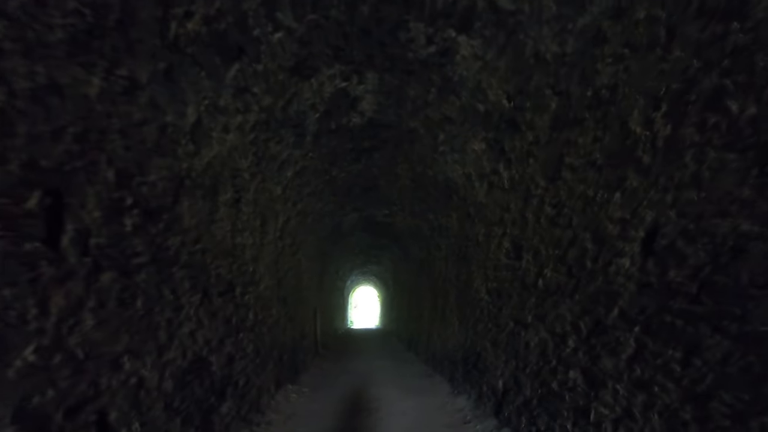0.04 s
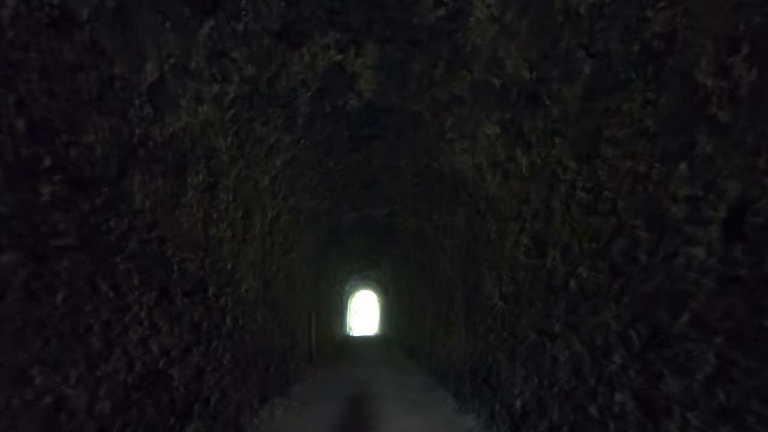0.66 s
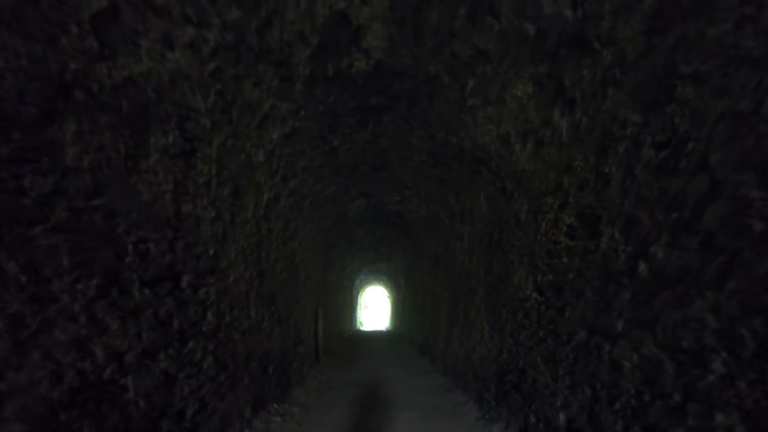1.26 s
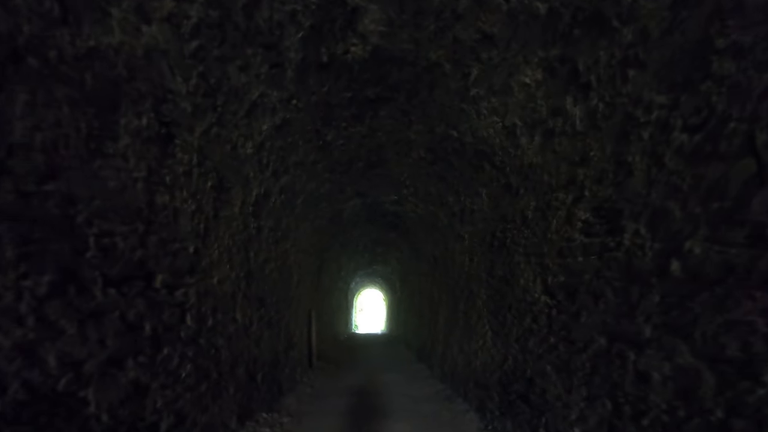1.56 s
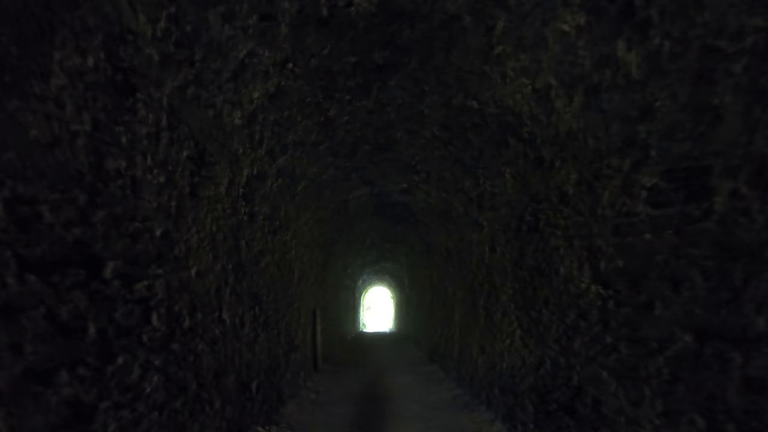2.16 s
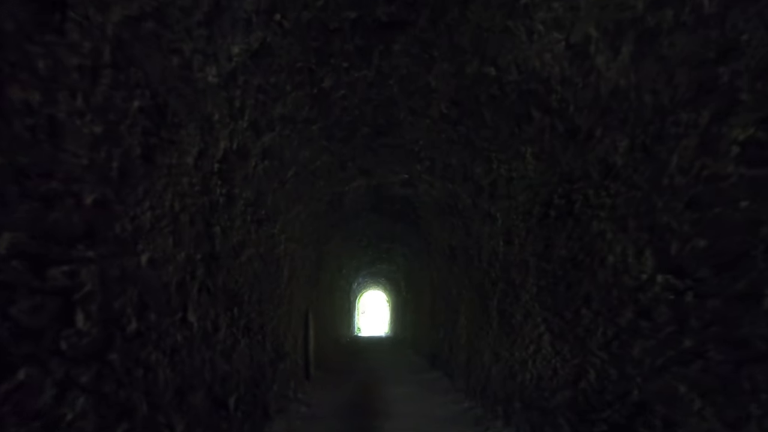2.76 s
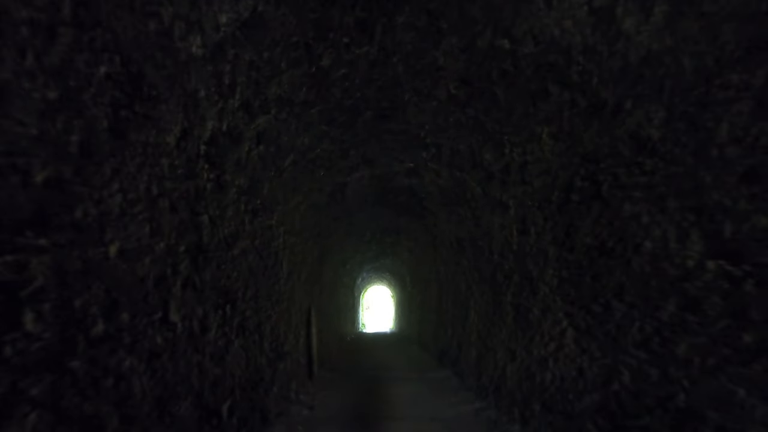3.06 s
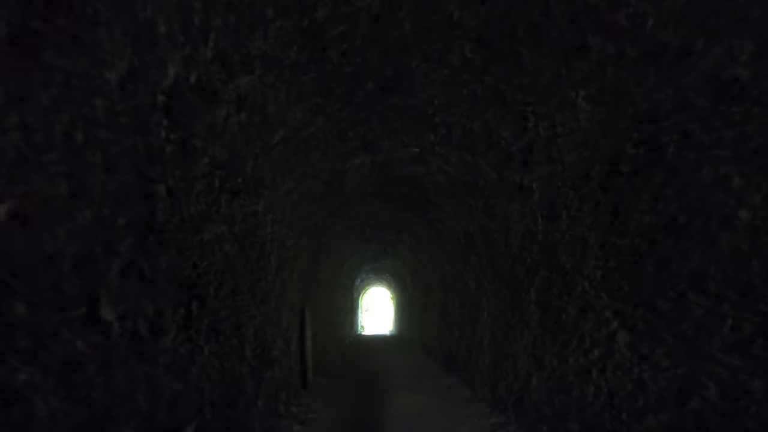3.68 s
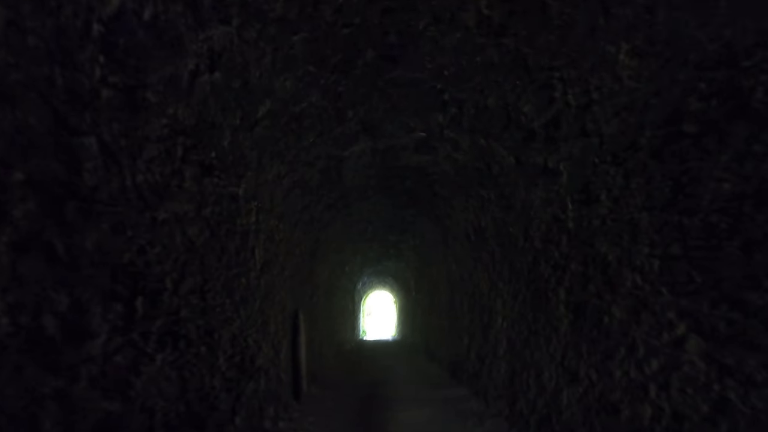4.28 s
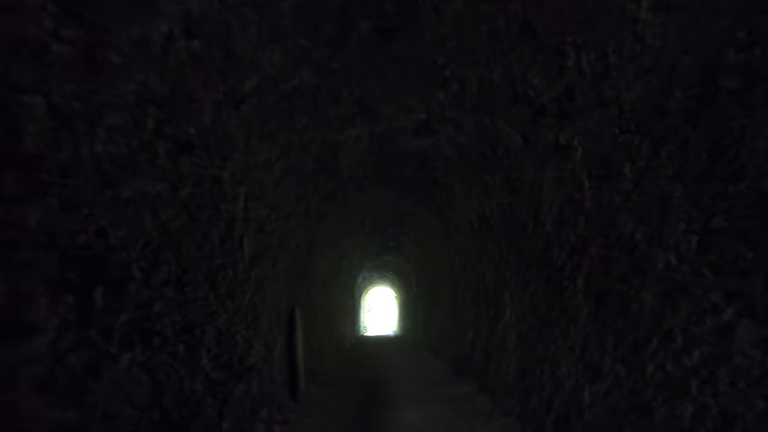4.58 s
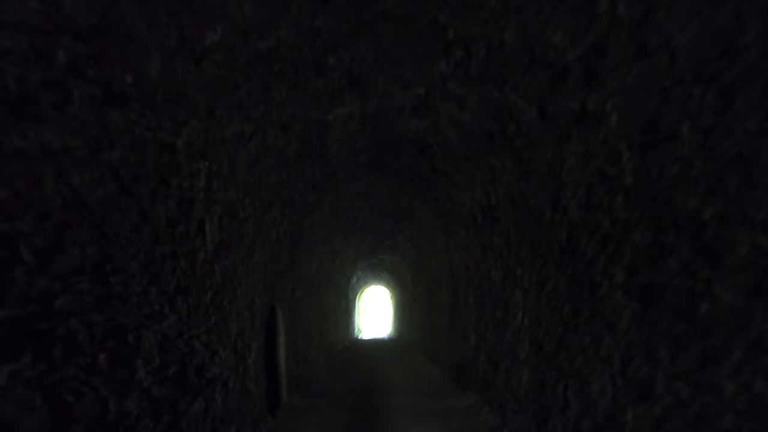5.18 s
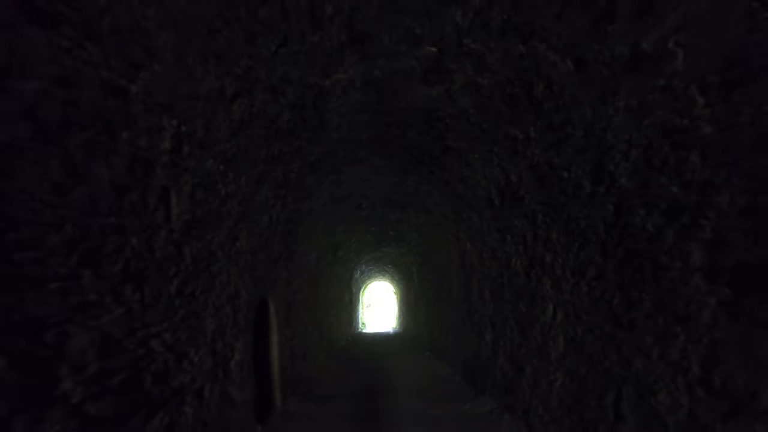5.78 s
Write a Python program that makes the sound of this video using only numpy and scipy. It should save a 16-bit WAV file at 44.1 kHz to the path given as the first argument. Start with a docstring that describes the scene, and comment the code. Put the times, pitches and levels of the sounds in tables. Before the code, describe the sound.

Someone walks through a stone tunnel, each step grinding grit and knocking small stones, with a short echo and faint clothing swish.

```python
"""Footsteps in a stone tunnel

Someone walks steadily over packed dirt and gravel through a narrow tunnel. Each sole lands with a
dull thud, knocks stones together and grinds the grit; clothing swishes and air buffets the
microphone with the stride. The close walls throw every knock back and the bore booms faintly
over a low wash of air."""
import sys
import numpy as np
from scipy import signal
from scipy.fft import rfft, irfft
from scipy.io import wavfile

SR = 44100
rng = np.random.default_rng(int(sys.argv[2]) if len(sys.argv) > 2 else 0)


def master(y):
    """Save y as 16-bit WAV."""
    cut = np.clip(np.atleast_2d(y).T, -1, 1)
    pcm = np.round(cut * 32767)  # scale
    wavfile.write(sys.argv[1], SR, pcm.astype(np.int16))


N = 257103
TIME_S = np.arange(N) / SR


def from_db(db):
    return 10 ** (np.asarray(db) / 20)


def unit_rms(x):
    return x / np.sqrt(np.mean(x ** 2) + 1e-20)


def gain_curve(rows):
    """Gain at every sample from rows of (s, dB)."""
    return from_db(np.interp(TIME_S, *np.transpose(rows)))


def at_hz(rows, hz):
    """Read a table on a log-frequency axis."""
    row_hz, values = np.transpose(rows)
    return np.interp(np.log(np.maximum(hz, 1)), np.log(row_hz), values)


def band(x, low_hz, high_hz, order=2):
    """Causal band-pass."""
    edges_hz = np.clip([low_hz, max(high_hz, low_hz * 1.1)], [10, 20], [.4 * SR, .45 * SR])
    return signal.sosfilt(signal.butter(order, edges_hz, "band", fs=SR, output="sos"), x + 1e-18)


def pan(left_db):
    """Left and right gains for a level difference."""
    return from_db(np.array([[.5], [-.5]]) * left_db)


def add(out, start_s, sound):
    start = max(round(start_s * SR), 0)
    out[..., start:start + sound.shape[-1]] += sound[..., :N - start]


def step_swells(after_s, peaks_db, rise_s, fall_s, flatness=4.3):
    """Power of one swell per step; bell-shaped at flatness 2, flatter on top above that."""
    power = np.zeros(N)
    for peak_s, db, rise, fall in np.broadcast(LANDINGS_S + after_s, peaks_db, rise_s, fall_s):
        away = np.abs(TIME_S - peak_s) / np.where(TIME_S < peak_s, rise, fall)
        near = away < 2
        power[near] += from_db(db) ** 2 * np.exp(-2 * away[near] ** flatness)
    return power


def contact(hz, octaves, order=2):
    """A dead blow of a cycle or two around its pitch; peak 1."""
    spread = 2 ** (octaves / 2)
    pulse = band(signal.unit_impulse(SR // 10), hz / spread, hz * spread, order)
    return pulse / np.abs(pulse).max()


def rattle(pulse, db, decay_s):
    """A contact followed by a few milliseconds of finer ones of the same colour."""
    t = TIME_S[:len(pulse)]
    fine = signal.fftconvolve(rng.standard_normal(len(t)), pulse)[:len(t)]
    fine = unit_rms(fine * np.exp(-t / decay_s))
    return pulse + from_db(db) * fine * np.sqrt(np.mean(pulse ** 2))


# Likeness of the channels in a diffuse field. Each row: frequency in Hz, coherence.
COHERENCE = [(30, 0.68), (70, -0.35), (130, 0.77), (300, 0.91), (600, 0.8), (1200, 0.53), (2400, 0.31),
             (4500, 0.38), (8000, -0.33), (13000, -0.036)]
# Lean of the diffuse field. Each row: frequency in Hz, left over right in dB.
LEAN_DB = [(100, 0.5), (300, 0.5), (600, 3), (1100, 4.5), (2000, 8), (4000, 5), (8000, 0), (13000, 6.5)]


def diffuse(spectrum_db):
    """Coloured noise from all sides, its channels most alike in the low mids."""
    hz = np.arange(N // 2 + 1) * SR / N
    mid, side = rfft(rng.standard_normal((2, N)))
    coherence = np.clip(at_hz(COHERENCE, hz), -1, 1)
    stereo = np.sqrt(1 + coherence) * mid + np.sqrt(1 - coherence) * side * [[1], [-1]]
    return unit_rms(irfft(stereo * from_db(at_hz(spectrum_db, hz)) * pan(at_hz(LEAN_DB, hz)), N))


# Tunnel air spectrum. Each row: frequency in Hz, relative density in dB.
WASH_SPECTRUM_DB = [(40, -40), (95, -16), (135, -5.5), (167, 2.5), (245, -2), (320, -1.5), (450, -7),
                    (790, -15), (1250, -12.5), (2100, -18), (3400, -24), (5500, -27.5), (7400, -24.5),
                    (14000, -47.5)]
# Tunnel air between swells. Each row: time in seconds, level in dB.
WASH_FLOOR_DB = [(0, -55.5), (1.5, -53.5), (2.2, -56), (3.1, -54.5), (4.2, -56.5), (4.9, -56.5),
                 (5.83, -58)]


def wash():
    """The tunnel's low wash swells a little after each footfall."""
    swells = step_swells(after_s=0.04, peaks_db=-57.5, rise_s=0.069, fall_s=0.29)
    return np.sqrt(gain_curve(WASH_FLOOR_DB) ** 2 + swells) * diffuse(WASH_SPECTRUM_DB)


# Body movement per step, delays from the heel landing. Each row: rustle delay and half-length in
# seconds, rustle level in dB, leg swing delay in seconds, swish and gust levels in dB.
STRIDE_MOVES = [(0.032, .13, -65.5, .275, -62.5, -56), (-0.021, 0.18, -66.5, 0.29, -60, -71),
                (0.082, 0.094, -64, 0.37, -58.5, -67), (0.077, 0.092, -61, .32, -60, -64),
                (0.065, 0.13, -65, .315, -62, -55), (0.061, 0.071, -61.5, 0.25, -59, -52.5),
                (0.032, 0.11, -61.5, 0.3, -62, -56.5), (0.077, 0.063, -64, 0.28, -58.5, -52.5),
                (.085, 0.086, -62, 0.38, -62, -58), (.085, 0.083, -64.5, 0.28, -60, -59),
                (0.01, 0.12, -63, 0.2, -66, -70)]
# Fabric spectrum. Each row: frequency in Hz, relative density in dB.
CLOTH_SPECTRUM_DB = [(400, -33), (750, -16), (1050, -3.5), (1300, -3.5), (1800, -9), (2700, -6.5),
                     (3400, -7.5), (4200, -9), (7200, -11.5), (9000, -21.5), (12900, -29), (15000, -51)]
# Crispness of the rub. Each row: time in seconds, treble gain in dB.
CLOTH_TREBLE_DB = [(0, 8), (.1, 7.5), (.5, -5.5), (5.83, -2.5)]


def clothing(rest_db=-69, trim_db=6.5, catch_db=1.15, catches_per_s=250, split_hz=7500, brightening=0.64):
    """Fabric rubs at each landing and leg swing, catching finely; a faster rub is brighter."""
    rustle_s, half_s, rustle_db, swing_s, swish_db, _ = np.transpose(STRIDE_MOVES)
    rustle = step_swells(rustle_s, rustle_db, half_s, half_s)
    swish = step_swells(swing_s, swish_db, rise_s=0.11, fall_s=0.079)
    speed = np.sqrt(from_db(rest_db) ** 2 + rustle + swish)
    catching = unit_rms(np.interp(TIME_S * catches_per_s, np.arange(N), rng.standard_normal(N)))
    rub = from_db(trim_db + catch_db * catching) * diffuse(CLOTH_SPECTRUM_DB)
    low = signal.sosfiltfilt(signal.butter(2, split_hz, fs=SR, output="sos"), rub)
    treble = (rub - low) * gain_curve(CLOTH_TREBLE_DB) * unit_rms(speed) ** brightening
    return speed * (low + treble)


# Buffeting spectrum. Each row: frequency in Hz, relative density in dB.
BUFFET_SPECTRUM_DB = [(15, -17), (28, 0.5), (40, -1), (60, -6.5), (100, -13), (200, -60)]


def buffet(rest_db=-66, trim_db=2.5):
    """Each stride pushes air over the microphone."""
    gust_db = np.array(STRIDE_MOVES)[:, -1]
    gusts = step_swells(after_s=0.13, peaks_db=gust_db, rise_s=0.066, fall_s=0.09)
    return from_db(trim_db) * np.sqrt(from_db(rest_db) ** 2 + gusts) * diffuse(BUFFET_SPECTRUM_DB)


# Stone knocks; the row at 1.3616 s is the quick ground echo of the loud knock just before it. # Each row: start
# in seconds, level in dB, pitch in Hz, bandwidth in octaves, relative edge level in dB.
STONE_KNOCKS = [(.1318, -38, 1690, 0.53, -23), (0.2564, -36.5, 2024, 0.54, -3),
                (0.6768, -41, 1390, 0.78, -23), (0.7036, -37, 1630, 0.49, -23),
                (.8329, -36.5, 1970, 0.91, -23), (0.9716, -34.5, 1440, 0.51, -23),
                (1.157, -31, 990, 1.7, -7), (1.215, -30.5, 1820, 1.7, -20), (1.229, -32.5, 1730, 1.7, -5.5),
                (1.245, -33.5, 1180, 0.62, -25), (1.3548, -21, 1530, 1.55, -15.5),
                (1.3616, -31.5, 1750, 1.16, -6), (1.714, -34, 1020, 2.9, -4.5),
                (1.735, -28.5, 2136, 1.6, -17), (1.908, -33.5, 990, 2.4, -20),
                (2.3025, -30, 1120, 1.7, -27), (2.322, -29.5, 1070, 1.6, -34),
                (2.8758, -37, 1630, 1.4, -14), (2.91, -41, 1650, 0.27, -18), (3.407, -33, 1370, 0.67, -26),
                (3.983, -32, 1490, 0.84, -5.5), (4.4151, -27.5, 1954, 1.1, -12.5),
                (4.428, -29, 1440, 0.89, -31), (5.0604, -36.5, 1400, 0.63, -19),
                (5.458, -41, 1282, 0.82, -23), (5.4969, -35.5, 1280, 1.95, -17),
                (5.706, -46, 1390, 1.1, -27)]


def knocks(body_hz=620, body_db=-12, edge_hz=3800, rock_db=-5, rock_s=0.0039):
    """Bedded stones clack and rock briefly; the ground adds body, the hard contact a bright edge."""
    out = np.zeros(N)
    body = from_db(body_db) * contact(body_hz, octaves=0.93)
    for start_s, db, hz, octaves, edge_db in STONE_KNOCKS:
        edge = from_db(edge_db) * contact(edge_hz, octaves=1)
        clack = contact(hz, octaves, order=4) + body + edge
        add(out, start_s, from_db(db) * rattle(clack, rock_db, rock_s))
    return out


# Steps: the heel lands, the weight arrives, the forefoot comes down. Each row: start in seconds,
# weight and forefoot delays in seconds, heel, weight and forefoot levels in dB, heel and forefoot
# pitches in Hz.
FOOTFALLS = [(.132, 0.034, .120, -37.5, -50, -43, 227, 200), (.678, 0.023, 0.15, -39.5, -37, -48, 153, 173),
             (1.153, .063, 0.2, -35.5, -37.5, -31.5, 165, 195),
             (1.713, .0325, .1045, -30.5, -27.5, -37.5, 152, 155),
             (2.302, .046, .104, -39.5, -31.5, -32.5, 337, 244),
             (2.876, .028, .133, -35, -34, -39.5, 284, 128),
             (3.407, 0.029, 0.094, -36, -44, -43, 183.5, 119),
             (3.944, .033, .147, -39.5, -37, -39.5, 212, 203),
             (4.417, .033, .092, -35, -32, -37.5, 194, 218),
             (5.043, 0.058, .149, -37.5, -39, -37, 167, 257),
             (5.603, 0.031, 0.096, -40.5, -63, -54, 179.3, 200)]
LANDINGS_S = np.array(FOOTFALLS)[:, 0]


def thuds(trim_db=-4.5, give_db=-6, scuff_db=-18, scuff_s=0.025):
    """The sole meets packed earth: a low push, a few cycles as the ground gives, a dull scuff above."""
    out, t = np.zeros(N), TIME_S[:SR // 10]
    for start_s, weight_s, fore_s, heel_db, weight_db, fore_db, heel_hz, fore_hz in FOOTFALLS:
        roll = [(0, heel_db, heel_hz), (weight_s, weight_db, heel_hz), (fore_s, fore_db, fore_hz)]
        for delay_s, db, hz in roll:
            push = contact(hz, octaves=1.81)
            give = from_db(give_db) * contact(hz, octaves=0.47, order=1)
            friction = unit_rms(band(rng.standard_normal(len(t)), hz * 1.88, hz * 3.2, order=3))
            scuff = from_db(scuff_db) * friction * np.exp(-t / scuff_s)
            add(out, start_s + delay_s, from_db(db + trim_db) * (push + give + scuff))
    return out


def grit(length_s, hz, body_db, grains_per_s=900, size_db=5, band_ratio=1.49, attack_s=0.0016):
    """Grains slip at random under the weight, fading as the sole settles."""
    t = TIME_S[:SR // 3]
    sizes = from_db(size_db * np.minimum(rng.exponential(1, len(t)), 3)) * rng.choice([-1, 1], len(t))
    slips = sizes * (rng.random(len(t)) < grains_per_s / SR)
    grains = unit_rms(band(slips, hz / band_ratio, hz * band_ratio, order=4))
    body = from_db(body_db) * unit_rms(band(slips, 344, 600))
    fines = from_db(-21) * unit_rms(band(slips, 3200, 3800))
    weight = (1 - np.exp(-t / attack_s)) * np.exp(-(t / length_s) ** 2)
    # The weight sets the energy, however the grains share it.
    return unit_rms(weight * (grains + body + fines)) * np.sqrt(np.mean(weight ** 2))


# Grit under each step. Each row: heel, weight and forefoot levels in dB, length in seconds,
# pitch in Hz, relative body level in dB.
GRIT_CRUNCHES = [(-55, -64, -62, 0.058, 1480, -2), (-69, -42.5, -47, 0.019, 1440, -4.5),
                 (-50.5, -47.5, -52, 0.032, 940, -6), (-41.5, -46, -61, .050, 1180, -3),
                 (-42.5, -44, -63, 0.08, 910, -10), (-50.5, -53.5, -52, 0.04, 1530, -0.5),
                 (-49.5, -57, -70, 0.043, 1320, -16), (-66, -37.5, -49, 0.016, 1290, -6),
                 (-43, -46, -47, 0.038, 1380, -1.5), (-47.5, -52, -52, 0.041, 1480, -1),
                 (-45.5, -54, -77, 0.031, 1220, -2.5)]


def crunches(trim_db=-0.5, toe_trim_db=1):
    """Grit grinds under a step's three contacts, then the swinging toe brushes it with the swish."""
    out = np.zeros(N)
    for step, crunch, move in zip(FOOTFALLS, GRIT_CRUNCHES, STRIDE_MOVES):
        start_s, weight_s, fore_s, *_ = step
        heel_db, weight_db, fore_db, *ground = crunch
        *_, swing_s, swish_db, _ = move
        for delay_s, db in [(0, heel_db), (weight_s, weight_db), (fore_s, fore_db)]:
            add(out, start_s + delay_s, from_db(db + trim_db) * grit(*ground))
        toe = grit(length_s=0.082, hz=1380, body_db=-8.5)
        add(out, start_s + swing_s, from_db(swish_db + toe_trim_db) * toe)
    return out


def pebbles(per_step=4, db=-44.5, spread_db=1, hz=1970, spread_octaves=0.66, within_s=0.18):
    """Loose pebbles shift at random under the rolling sole and click faintly."""
    out = np.zeros(N)
    for start_s in LANDINGS_S:
        for when, size, pitch in rng.uniform(-1, 1, (per_step, 3)):
            click = contact(hz * 2 ** (spread_octaves * pitch), octaves=0.81)
            add(out, start_s + abs(when) * within_s, from_db(db + spread_db * size) * click)
    return out * pan(7.5)


# First echoes off ground and walls. Each row: delay in seconds, gain in dB.
FIRST_ECHOES = [(.0067, -7), (.0172, -38), (0.024, -15), (0.0327, -12)]
# Scatter off rough stone. Each row: frequency in Hz, relative density in dB.
SCATTER_SPECTRUM_DB = [(80, 5), (200, 3), (500, 5), (1100, 0), (2000, 1.5), (3000, 1.5), (6000, 4),
                       (12000, 10)]
# Late tail. Each row: frequency in Hz, T60 in seconds.
TAIL_T60_S = [(100, 0.26), (400, 3.1), (1500, 0.13), (4000, 0.78), (12000, 0.22)]
# Cross modes of the bore. Each row: frequency in Hz, gain in dB, T60 in seconds.
BORE_MODES = [(65.6, 5, 0.33), (125.3, 10, 0.93), (151.7, 10.5, 0.83), (193.2, 12, 0.53), (284, -35, 0.92),
              (357, 5.5, 0.22), (437, 3.5, 0.22), (483.7, -6, 0.16), (760, -18, 0.44), (840, -23, 0.6),
              (1033, 9, 0.37)]


def tunnel(x, early_db=-3, early_t60_s=0.34, build_s=0.0047, tail_db=-12, bore_trim_db=-1):
    """Stone walls return distinct echoes, a burst of scatter, a soft tail and the boom of the bore."""
    t = TIME_S[:SR]
    scatter = diffuse(SCATTER_SPECTRUM_DB)[:, :SR]
    scatter /= np.sqrt(np.mean(np.abs(rfft(scatter)[:, 500:2000]) ** 2) / SR)  # unit density, 0.5-2 kHz
    build = 1 - np.exp(-(t / build_s) ** 4)
    early = build * from_db(-60 * t / early_t60_s)
    response = from_db(early_db) * scatter * early / np.linalg.norm(early)
    octaves_hz = 60 * 2. ** np.arange(9)
    for low_hz, high_hz in zip(octaves_hz, octaves_hz[1:]):
        fade = build * from_db(-60 * t / at_hz(TAIL_T60_S, np.sqrt(low_hz * high_hz)))
        response += from_db(tail_db) * band(scatter, low_hz, high_hz) * fade / np.linalg.norm(fade)
    for hz, db, t60_s in BORE_MODES:
        fade = from_db(-60 * t / t60_s)
        response += from_db(db + bore_trim_db) * 2 * fade / fade.sum() * np.cos(2 * np.pi * hz * t)
    out = x + signal.fftconvolve(x.mean(axis=0)[None], response, axes=1)[:, :N]
    for delay_s, db in FIRST_ECHOES:
        add(out, delay_s, from_db(db) * x)
    return out


# Sharp chips. Each row: start in seconds, level in dB, pitch in Hz, bandwidth in octaves.
STONE_CHIPS = [(1.1495, -39.5, 3150, 0.47), (1.81, -35.5, 6550, 0.96), (1.88, -40.5, 5970, 0.88),
               (1.9075, -41, 5290, 0.76), (4.588, -38.5, 2960, 2.1), (5.497, -41, 3230, 0.58)]


def chips(trim_db=-4.5, splinter_db=0, splinter_s=0.0013):
    """Tiny stones snap with a bright tick and a brief splintering."""
    out = np.zeros(N)
    for start_s, db, hz, octaves in STONE_CHIPS:
        snap = rattle(contact(hz, octaves), splinter_db, splinter_s)
        add(out, start_s, from_db(db + trim_db) * snap)
    return out


def scene():
    """Steps echo in the tunnel; clothing, air and a share of the chips stay dry."""
    ticks = chips() * pan(5.2)
    steps = thuds() * pan(0.69) + knocks() * pan(7.5) + pebbles()
    steps += crunches() * pan(3.7) + from_db(4) * ticks
    steps[0] = np.roll(steps[0], shift=1)  # the ground reaches the left side one sample later
    air = wash() + buffet()
    return tunnel(steps) + ticks + clothing() + air


def record(dry, shelf_hz=7800, shelf_db=-4, cutoff_hz=15000):
    """The microphone dulls the top octave, and the very top is cut."""
    low = signal.sosfiltfilt(signal.butter(6, shelf_hz, fs=SR, output="sos"), dry)
    dulled = low + from_db(shelf_db) * (dry - low)
    return signal.sosfilt(signal.ellip(10, .1, 80, cutoff_hz, fs=SR, output="sos"), dulled)


dry = scene()
out = record(dry)
master(out)
```